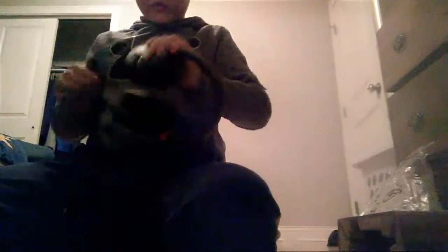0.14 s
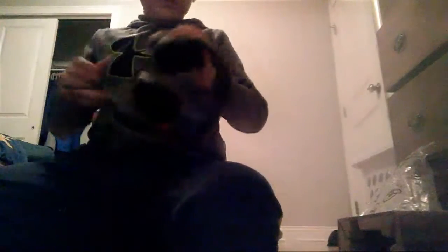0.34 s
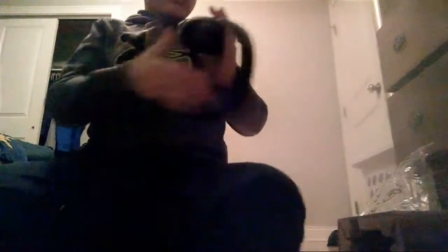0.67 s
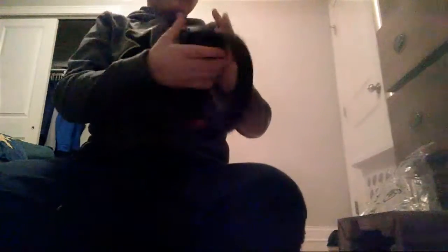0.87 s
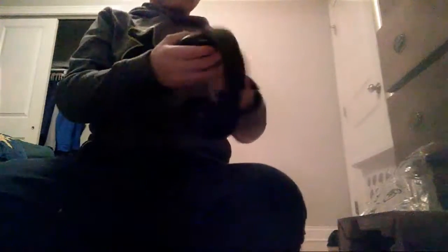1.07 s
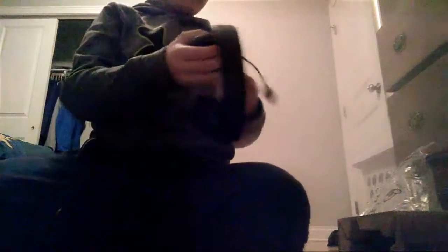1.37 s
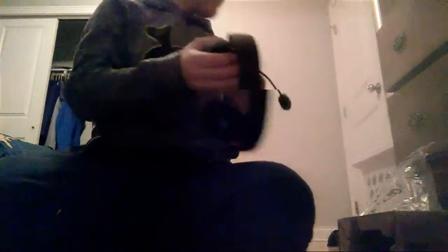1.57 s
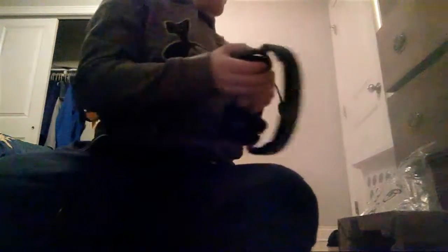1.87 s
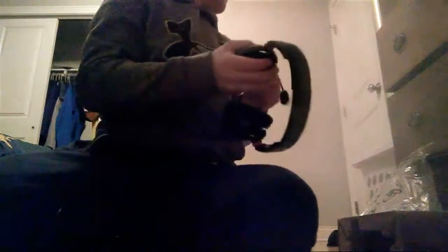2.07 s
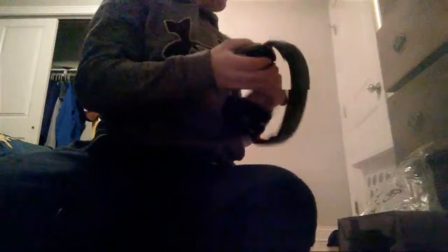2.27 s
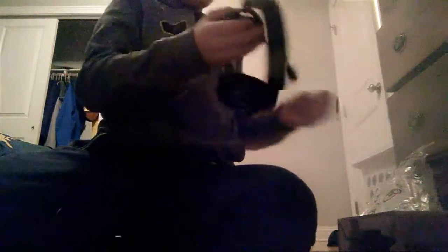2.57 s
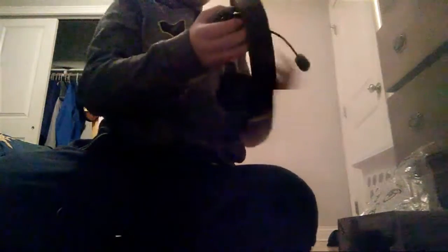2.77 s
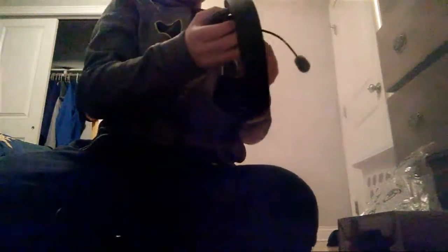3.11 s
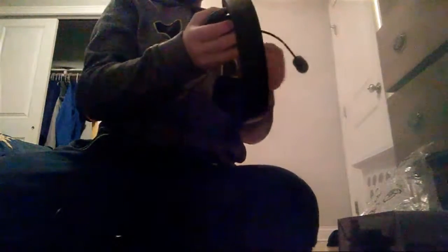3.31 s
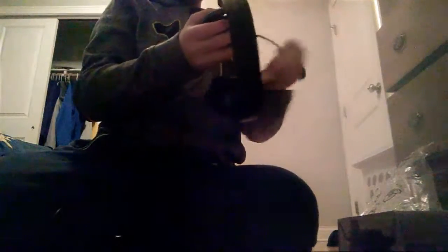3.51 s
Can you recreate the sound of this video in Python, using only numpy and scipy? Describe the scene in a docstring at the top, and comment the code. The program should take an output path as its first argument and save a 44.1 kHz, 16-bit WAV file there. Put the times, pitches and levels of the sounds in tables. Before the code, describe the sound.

A plastic headset is handled close to a small microphone in a quiet bedroom: light clicks, knocks, rubbing and a faint finger squeak, then a pause and a loud, boomy door thump out of sight.

```python
"""In a small, quiet bedroom a plastic headset is turned over in the hands.
Skin and cloth rub as grainy noise, hand movements hiss, and soft low bumps come from pushed modes.
The shells click and knock as struck resonators, and fingers slide with a thin squeak in narrow resonances.
Near the end, after a soft airy swell of noise, something out of sight, probably a door, knocks lightly and
then shuts with a loud thump: decaying noise and panel tones, a high hiss, and low modes that boom."""
import sys
import numpy as np
from scipy import signal
from scipy.io import wavfile

SR = 44100
rng = np.random.default_rng(int(sys.argv[2]) if len(sys.argv) > 2 else 0)


def persist_wave(psi):
    """Save psi, clipped to +-1, as 16-bit WAV."""
    counts = np.round(np.clip(psi, -1, 1) * 32767).astype(np.int16)
    wavfile.write(sys.argv[1], SR, np.atleast_2d(counts).T)


N = 160965
TIME = np.arange(N) / SR


def from_db(db):
    """Logarithmic level: 20 dB is a factor of ten in amplitude."""
    return 10 ** (np.asarray(db) / 20)


def rms_one(x):
    """Normalisation: divide by the root mean square to get unit power."""
    return x / np.sqrt(np.mean(x ** 2) + 1e-20)


def level(curve):
    """Envelope: gain over time, linear in dB between (t/s, level/dB) points."""
    return from_db(np.interp(TIME, *np.transpose(curve)))


def at_hz(points, hz):
    """Logarithmic pitch scale: read a (f/Hz, value) table on a log-frequency axis."""
    f, value = np.transpose(points)
    return np.interp(np.log(hz), np.log(f), value)


def filtered(x, hz, kind, order=2):
    """Linear filtering: a Butterworth response, maximally flat in the passband."""
    edges = np.clip(hz, 10, .45 * SR)
    return signal.sosfilt(signal.butter(order, edges, kind, fs=SR, output="sos"), x + 1e-18)


def white_noise(count=N):
    """White noise: equal power at every frequency."""
    return rng.standard_normal(count)


def band_around(hz, width):
    """Bandwidth: the edges of a band centred on hz."""
    return [hz - width / 2, hz + width / 2]


def flicker(rate):
    """Random modulation: low-passed noise of spread 1, varying no faster than about rate in Hz."""
    return rms_one(filtered(white_noise(), rate, "low"))


def noise_bands(colour):
    """Third-octave analysis: bands of noise whose powers sum to 1, as [(Hz, band)]."""
    edges = 28 * 2 ** (np.arange(29) / 3)
    centres = np.sqrt(edges[1:] * edges[:-1])
    sources = [white_noise(), white_noise()]  # neighbouring bands take different noise
    bands = []
    for k, hz in enumerate(centres):
        band = filtered(sources[k % 2], edges[k:k + 2], "band", order=3)
        bands.append(from_db(at_hz(colour, hz)) * band)
    total = np.sqrt(sum(np.var(band) for band in bands))
    return [(hz, band / total) for hz, band in zip(centres, bands)]


def noise(colour):
    """Superposition: the bands add up to coloured noise of about unit power."""
    return sum(band for hz, band in noise_bands(colour))


def tone(hz, db):
    """Pure tone: a steady sine of random phase, with db as its rms level."""
    return np.sqrt(2) * from_db(db) * np.sin(2 * np.pi * (hz * TIME + rng.random()))


def ring(force, hz, t60):
    """Damped resonance: a unit impulse starts a decaying sine of initial height 1."""
    radius = from_db(-60 / (t60 * SR))
    angle = 2 * np.pi * hz / SR
    return signal.lfilter([0, np.sin(angle)], [1, -2 * radius * np.cos(angle), radius ** 2], force + 1e-18)


def impulses(times, gains):
    """Impulsive excitation: one single-sample click at each time."""
    return np.bincount((times * SR).astype(int), gains, N)[:N]


def burst(hz, kind, db, t60):
    """Exponential decay: a short filtered noise; db is its starting level before the filter."""
    t = TIME[:SR // 10]
    return filtered(white_noise(len(t)), hz, kind) * from_db(db - 60 * t / t60)


def pushed(blows, modes):
    """Contact-time law: half-sine pushes excite a set of modes; a longer contact sounds duller."""
    force = 0
    for s, db, contact in blows:
        push = np.sin(np.pi * np.clip((TIME - s) / contact, 0, 1))
        force = force + from_db(db) * push / push.sum()
    # neighbouring modes move in opposite phase
    return sum(from_db(db) * ring(force, hz, t60) * (-1) ** k for k, (hz, db, t60) in enumerate(modes))


# noise spectrum of the still room: (f/Hz, relative level/dB per Hz)
FLOOR_COLOUR = [(30, -25.5), (55, -2.5), (140, 1), (190, -16), (290, -9.5), (400, -17), (600, -21),
                (800, -30), (1150, -26.5), (1600, -36.5), (3000, -38.5), (6000, -43), (11000, -44),
                (13000, -42.5), (15500, -40.5)]
# mains hum: (f/Hz, level/dB)
HUM_TONES = [(59.2, -76.5), (118.4, -75.5), (290.7, -81.5)]
FLOOR_DB = -67.5


def still_room():
    """Background noise: a steady broadband floor of low rumble and faint hiss, plus tones of mains hum."""
    hum = sum(tone(hz, db) for hz, db in HUM_TONES)
    return from_db(FLOOR_DB) * noise(FLOOR_COLOUR) + hum


# fingers and sleeves rubbing on the plastic, then a soft airy swell before the door knocks: (t/s, level/dB)
RUB_AND_SWELL_LEVEL = [(0, -73), (.13, -69), (.46, -74), (.6, -78), (.66, -63), (.74, -58), (.82, -66),
                       (.95, -71), (1.06, -70), (1.16, -68), (1.24, -53.5), (1.33, -68.5), (1.42, -75),
                       (1.53, -68), (1.58, -63.5), (1.68, -61), (1.82, -68), (2.02, -77), (2.08, -66.5),
                       (2.16, -79), (2.78, -78.5), (2.95, -68.5), (3.65, -71)]
# spectrum of the rubbing and the swell: (f/Hz, relative level/dB per Hz)
RUB_AND_SWELL_COLOUR = [(60, -21), (200, 12.5), (350, 4), (550, 1.5), (1150, -3.5), (1600, -8.5),
                        (2800, -16), (4000, -26), (7000, -36), (15000, -25.5)]
# high hiss of the hand movements, and from about 3 s of the door's knock and slam: (t/s, level/dB)
HISS_LEVEL = [(0, -105), (.1, -88), (.16, -78), (.27, -75), (.49, -71), (.56, -72.5), (.65, -80),
              (.72, -67.5), (.89, -71), (.98, -74), (1.05, -69), (1.16, -83), (1.26, -72.5), (1.37, -76.5),
              (1.52, -76), (1.58, -71.5), (1.65, -94), (1.8, -84.5), (2.2, -104), (2.93, -100), (3.02, -76),
              (3.155, -85), (3.18, -65.5), (3.45, -74.5), (3.62, -86)]
# spectrum of the hiss: (f/Hz, relative level/dB per Hz)
HISS_COLOUR = [(2000, 8.5), (4000, 1), (7200, -3.5), (9400, -2), (12000, 2), (15500, 2)]
GRAIN_DB, GRAIN_RATE_HZ = 0.5, 81  # spread and speed of the grain
HISS_PEAK_HZ, HISS_PEAK_WIDTH_HZ, HISS_PEAK_DB = 8340, 440, -16.5  # level relative to the hiss


def rub_swell_and_hiss():
    """Modulated noise: grainy for rubbing and the airy swell, smooth and high for hand and door hiss."""
    grain = rms_one(from_db(GRAIN_DB * flicker(GRAIN_RATE_HZ)))
    peak = rms_one(filtered(white_noise(), band_around(HISS_PEAK_HZ, HISS_PEAK_WIDTH_HZ), "band"))
    rub_and_swell = grain * noise(RUB_AND_SWELL_COLOUR)
    hiss = noise(HISS_COLOUR) + from_db(HISS_PEAK_DB) * peak
    return level(RUB_AND_SWELL_LEVEL) * rub_and_swell + level(HISS_LEVEL) * hiss


# soft pushes of hands and body: (t/s, impulse level/dB, contact time/s)
BUMPS = [(0.014, -63, 0.0065), (0.124, -50, .008), (0.183, -61, 0.0036), (0.654, -54, 0.0056),
         (0.667, -45, 0.0086), (0.688, -58, 0.0025), (0.738, -56, 0.0057), (1.004, -56, 0.0035),
         (1.03, -61, 0.00078), (1.176, -52, 0.0097), (1.213, -47.5, 0.0063), (1.226, -51, 0.00071),
         (1.238, -53.5, 0.0012), (1.266, -58, 0.0026), (1.806, -60, 0.0078), (1.852, -59, 0.0034)]
# low modes that the bumps ring: (f/Hz, relative level/dB, t60/s)
BODY_MODES = [(69.1, 4.5, .24), (117.3, 5, 0.25), (149.3, 5, 0.25), (268, 2, 0.097), (370, -5, 0.076)]


def soft_bumps():
    """Modal excitation: soft pushes of hands and body ring a few low modes."""
    return pushed(BUMPS, BODY_MODES)


# plastic contacts: (t/s, level/dB, tick level re contact/dB, tilt about 1 kHz/dB per octave)
CLICKS = [(0.147, -54.5, -15, -1.5), (0.508, -42.5, -9, -5.5), (0.509, -50, -13, 2), (0.52, -58, -25, 2),
          (0.643, -54, -16, 1.5), (0.735, -46.5, -13, -4), (0.748, -52.5, -10, -3), (0.94, -53.5, -14, -2),
          (0.9734, -44, -22, 1), (1.0055, -39.5, 1.5, 0.5), (1.0291, -35.5, -13, 1.5),
          (1.035, -48, -16, 2.5), (1.053, -57, -16, -6), (1.228, -52, -26, -7), (1.238, -45.5, -24, -7),
          (1.246, -59, -18, -1), (1.292, -51.5, -12, -7), (1.462, -53.5, -20, -5.5)]
# modes of the shell: (f/Hz, relative level/dB, t60/s)
SHELL_MODES = [(362, -16, 0.051), (545, -9.5, 0.029), (628, -16.5, .05), (820, -11, 0.022),
               (1066, -7.5, 0.029), (1207, -8.5, 0.02), (1550, -12.5, 0.012), (1840, -14, 0.031),
               (2172, -12.5, 0.017), (2900, -13, 0.0076), (4140, -24.5, 0.0094), (6000, -27, 0.017),
               (8450, -31, 0.017)]
TICK_DB, TICK_T60_S, TICK_LOW_HZ = -9.5, .011, 2970
CRACK_DB, CRACK_T60_S, CRACK_BAND_HZ = -2, .025, (460, 2530)  # dense small modes of the shell


def plastic_clicks():
    """Modal synthesis: each contact strikes every shell mode, with a sharp tick and a noisy crack."""
    s, db, tick_db, tilt = np.transpose(CLICKS)
    spread_db = 1.8 * rng.standard_normal((len(s), len(SHELL_MODES)))  # every contact balances the modes anew
    shell = 0
    for k, (hz, mode_db, t60) in enumerate(SHELL_MODES):
        blow_db = db + mode_db + tilt * np.log2(hz / 1000) + spread_db[:, k]
        shell = shell + ring(impulses(s, from_db(blow_db)), hz, t60) * (-1) ** k
    tick_burst = burst(TICK_LOW_HZ, "high", TICK_DB, TICK_T60_S)
    crack_burst = burst(CRACK_BAND_HZ, "band", CRACK_DB, CRACK_T60_S)
    tick = signal.fftconvolve(impulses(s, from_db(db + tick_db)), tick_burst)
    crack = signal.fftconvolve(impulses(s, from_db(db)), crack_burst)
    return shell + (tick + crack)[:N]


ROOM_T60_S, ROOM_DB, ROOM_DULL_HZ, ROOM_GAP_S = 0.28, -13.5, 3000, 0.0053


def bedroom(x):
    """Reverberation: add a short, dull, diffuse tail that decays exponentially after a brief gap."""
    t = TIME[:SR // 2]
    dull_noise = filtered(white_noise(len(t)), ROOM_DULL_HZ, "low")
    tail = dull_noise * from_db(-60 * t / ROOM_T60_S) * (t > ROOM_GAP_S)
    return x + from_db(ROOM_DB) * signal.fftconvolve(x, tail / np.linalg.norm(tail))[:N]


# thin squeaks of sliding fingers: (start t/s, length/s, level/dB, resonance f/Hz, width/Hz)
SLIDES = [(1.562, 0.065, -63.5, 1130, 111), (1.563, 0.035, -74, 3900, 590), (1.56, 0.039, -67, 1970, 200),
          (1.626, 0.061, -67.5, 2660, 169), (1.684, 0.049, -74.5, 2720, 200), (1.72, 0.11, -81, 2830, 393)]


def finger_slides():
    """Resonant friction: noise in one narrow band swells and fades with each stroke."""
    out = 0
    for s, length, db, hz, width in SLIDES:
        stroke = np.sqrt(np.abs(np.sin(np.pi * np.clip((TIME - s) / length, 0, 1))))
        squeak = rms_one(filtered(white_noise(), band_around(hz, width), "band", order=1))
        out = out + from_db(db) * stroke * squeak
    return out


# clatters of the door: (t/s, level/dB, rise/s, hold/s, tilt about 1 kHz/dB per octave)
CLATTERS = [(2.979, -54, 0.027, 0.013, -1), (3.159, -49.5, 0.019, 0.0085, 5), (3.177, -37, .02, 0.036, -2),
            (3.406, -70, 0.01, 0.016, 3.5)]
# spectrum of the clatter noise before the tilt: (f/Hz, relative level/dB per Hz)
CLATTER_COLOUR = [(35, 2), (60, 0), (130, 11), (220, 9.5), (320, 6), (430, -0.5), (560, 2), (760, -4),
                  (1020, -2), (1350, -5), (1900, -5), (3000, -11.5), (4000, -18), (5200, -23.5),
                  (7200, -35), (8400, -31.5), (10000, -48), (15000, -50)]
# decay time of the clatter: (f/Hz, t60/s)
CLATTER_T60 = [(60, 0.41), (300, 0.59), (1000, 0.62), (2500, 0.51), (5000, 0.42), (10000, 0.16)]
# panel tones inside the clatter: (f/Hz, level re clatter noise before the tilt/dB)
PANEL_TONES = [(194, -5.5), (291, -7.5), (378, -16), (426, -25), (483, -22), (534, -17), (648, -20),
               (898, -24), (1023, -17.5), (1608, -36), (1760, -27), (1975, -22), (2592, -32), (2905, -24.5)]
CLATTER_GRAIN_DB, CLATTER_GRAIN_RATE_HZ = 1, 100


def door_clatter():
    """Frequency-dependent damping: diffuse noise and panel tones rise, hold and die band by band."""
    tones = [(hz, tone(hz, db)) for hz, db in PANEL_TONES]
    parts = noise_bands(CLATTER_COLOUR) + tones
    clatter = np.zeros(N)
    for s, db, rise, hold, tilt in CLATTERS:
        start = int(s * SR)
        age = TIME[:N - start]
        onset = np.clip(age / rise, 0, 1)
        for hz, part in parts:
            fall_db = 60 * np.maximum(age - rise - hold, 0) / at_hz(CLATTER_T60, hz)
            gain = from_db(db + tilt * np.log2(hz / 1000) - fall_db)
            clatter[start:] += part[start:] * onset * gain
    return clatter * from_db(CLATTER_GRAIN_DB * flicker(CLATTER_GRAIN_RATE_HZ))


# shocks that the door gives the wall: (t/s, impulse level/dB, contact time/s)
SHOCKS = [(3.0, -63.5, 0.0016), (3.035, -78, 0.0037), (3.173, -38, 0.0046), (3.19, -28.5, 0.0051),
          (3.226, -36.5, .003), (3.243, -25, 0.0044), (3.2595, -21, 0.0026)]
# low modes of wall and room, and a heavily damped 110 Hz mode for the dull push itself: (f/Hz, relative
# level/dB, t60/s)
BOOM_MODES = [(59.4, -9, 0.48), (78.8, -0.5, 0.52), (93, -1, 0.51), (110, 8.5, 0.037), (117.3, -15, 0.76),
              (147.1, -5, 0.3), (195.4, -6, 0.33), (216.8, -6.5, 0.41), (300, -6.5, 0.14)]


def door_boom():
    """Room modes: the door's shocks ring the low resonances of wall and room, plus a short, heavily damped low
    thud of the push."""
    return pushed(SHOCKS, BOOM_MODES)


def scene():
    """Superposition: all sources add at one microphone; the clicks alone pass through the room tail."""
    handling = bedroom(plastic_clicks()) + soft_bumps()
    noises = rub_swell_and_hiss() + finger_slides()
    door = door_clatter() + door_boom()
    return (handling + noises + door + still_room())[None]


LOW_CUT_HZ, CUTOFF_HZ = 38.6, 15900


def record(dry):
    """Band limiting: a small microphone loses the deep bass, and the top is cut steeply."""
    without_bass = filtered(dry, LOW_CUT_HZ, "high", order=4)
    top_cut = signal.ellip(10, .1, 70, CUTOFF_HZ, fs=SR, output="sos")
    return signal.sosfilt(top_cut, without_bass)


dry = scene()
out = record(dry)
persist_wave(out)
```